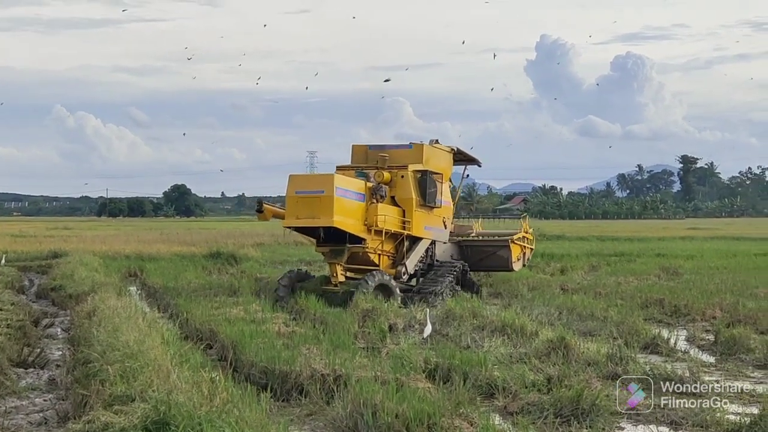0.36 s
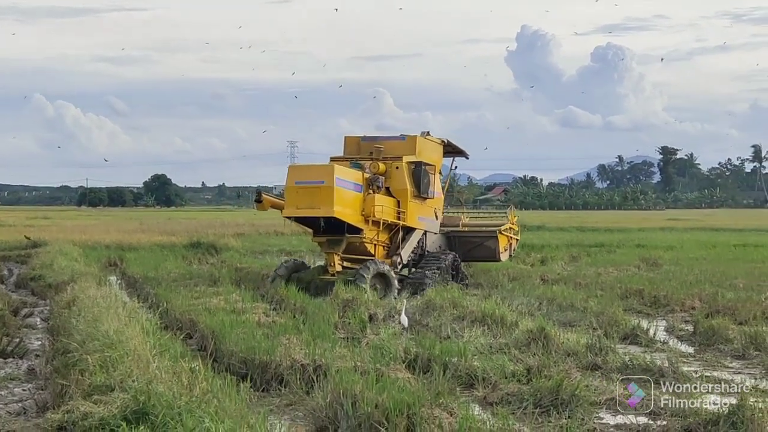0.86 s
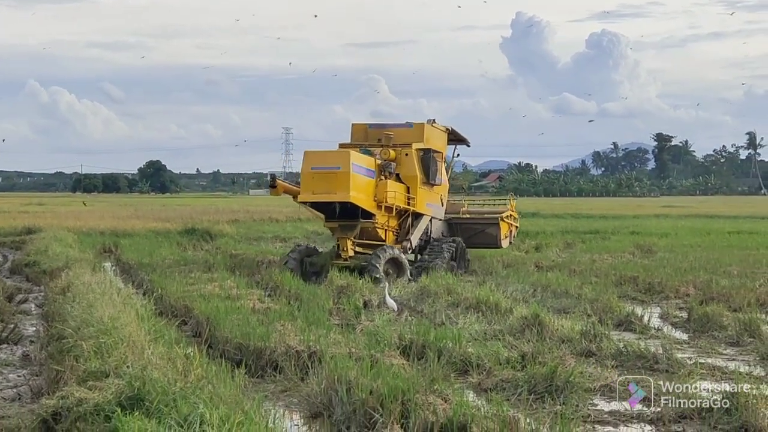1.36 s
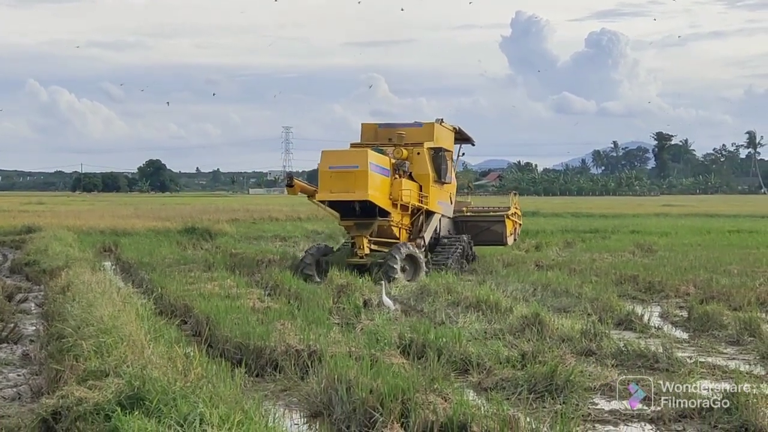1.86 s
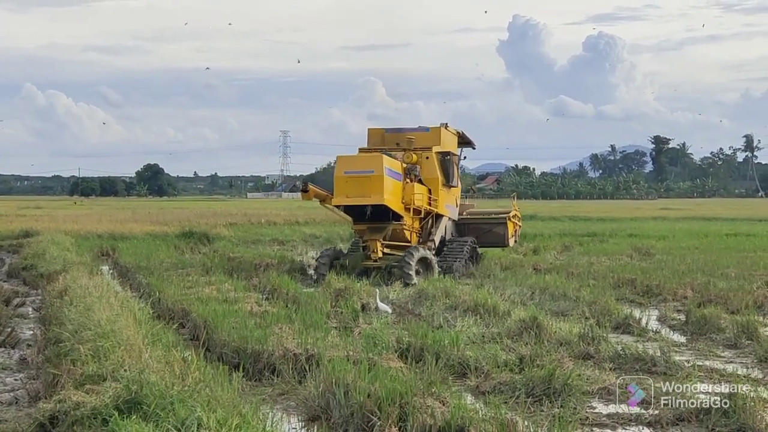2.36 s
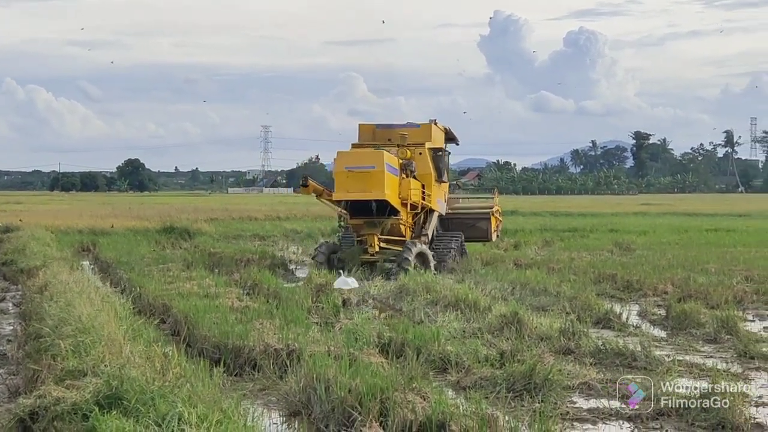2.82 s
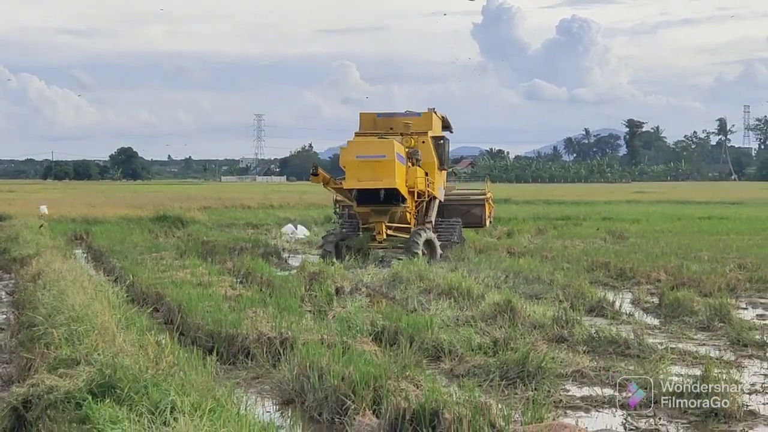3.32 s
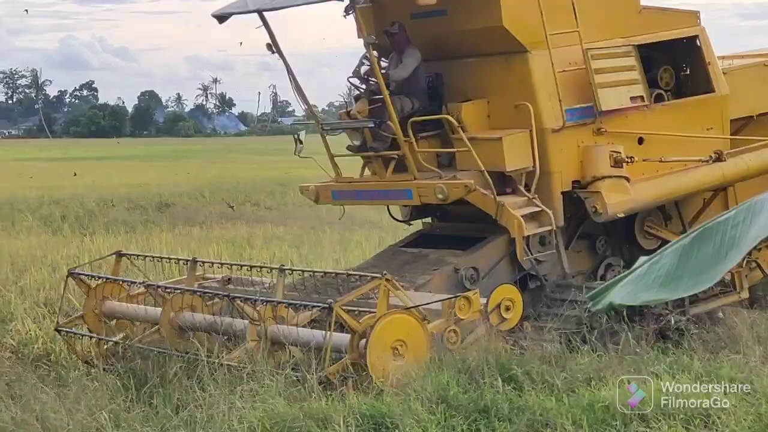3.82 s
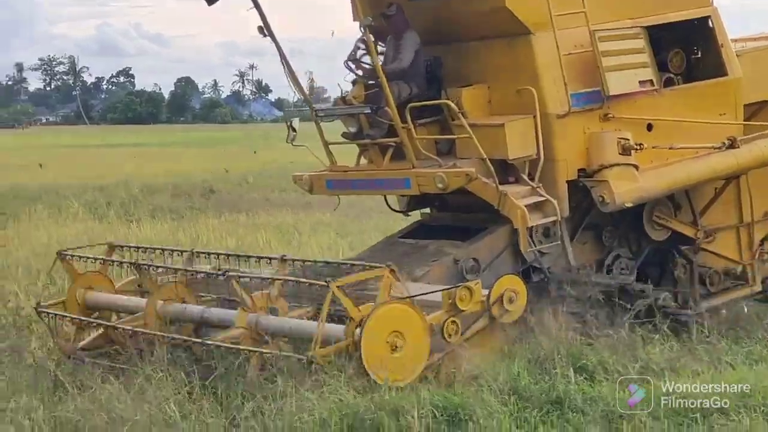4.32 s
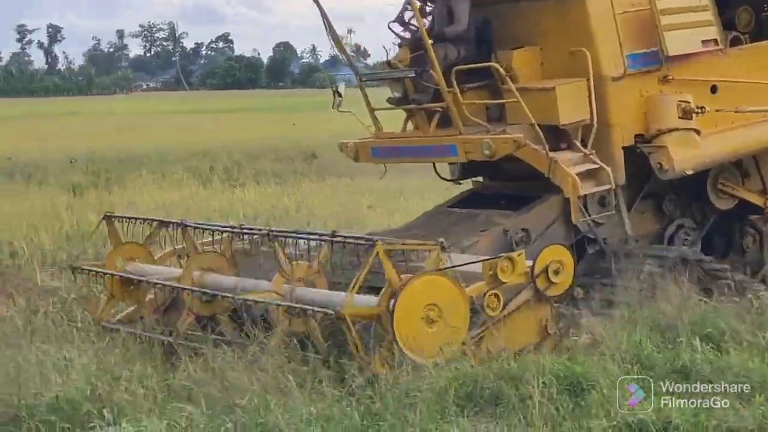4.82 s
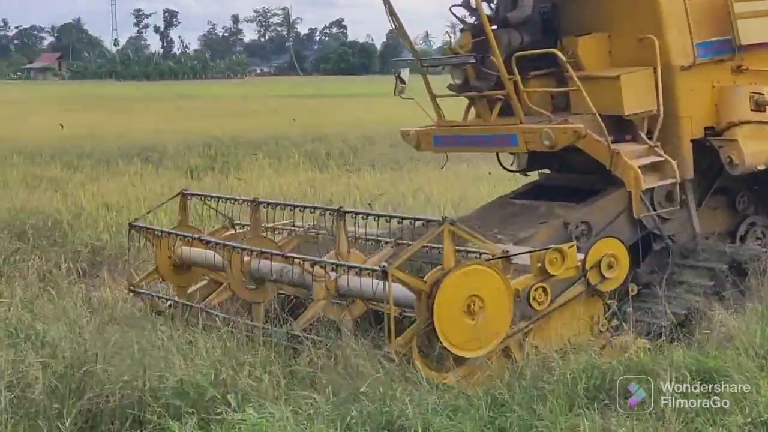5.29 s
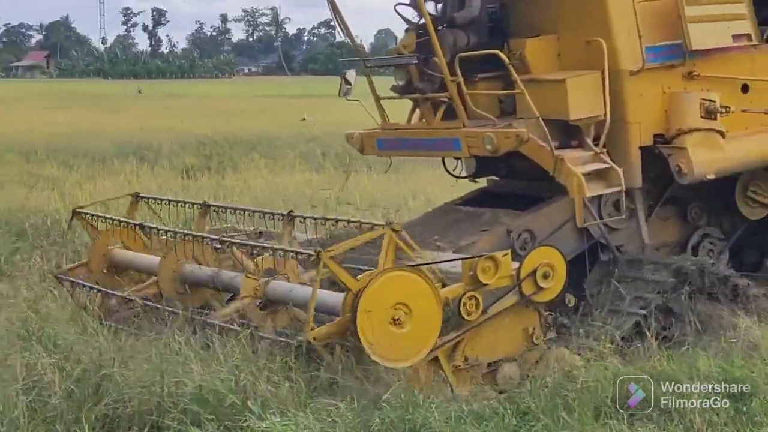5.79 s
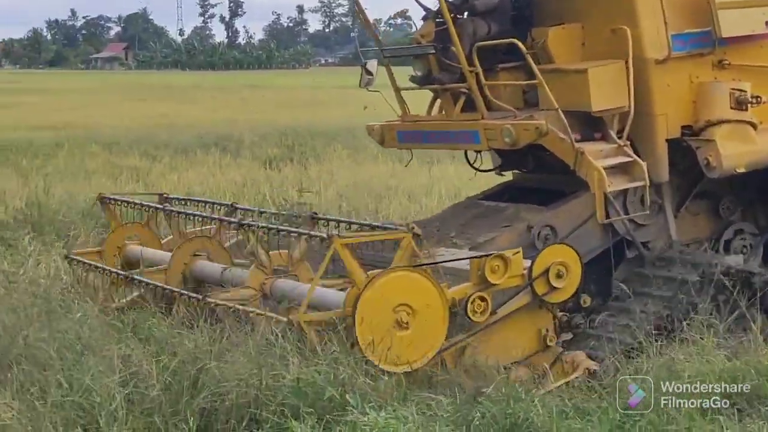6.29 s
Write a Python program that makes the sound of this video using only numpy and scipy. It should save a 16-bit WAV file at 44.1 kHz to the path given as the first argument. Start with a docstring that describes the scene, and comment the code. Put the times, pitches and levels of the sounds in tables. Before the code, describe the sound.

A phone outdoors hears a combine harvester driving away: a clean, humming exhaust tone around a low B, with dense low roar and soft clatter, some faint high chain tinkles early on. A brief digital repeat leads into a half-second total dropout. The machine then cuts back in at close range, slightly higher in pitch, with more belt hiss, reel clatter and crop rustle, running steadily until the cut-off.

```python
"""A steady diesel drone with clean exhaust tones stands over a roar of knock, fan and threshing noise.
A six-cylinder harvester works a wet field, heard by a phone: driving away, then, after silence, close by.
Tones follow the firing count; the roar is shaped noise, flickering by bands and echoed off the water surface.
Chains jingle faintly in the first shot, as bursts of resonant noise; short low booms swell in both.
At the cut the last 21 ms are heard twice, then half a second of silence leads to the near shot."""
import sys
import numpy as np
from scipy import signal
from scipy.fft import rfft, irfft
from scipy.io import wavfile
from scipy.ndimage import uniform_filter1d

SR = 44100
rng = np.random.default_rng(int(sys.argv[2]) if len(sys.argv) > 2 else 0)


def output_pcm(signal):
    """Save a mono or channel-first signal as 16-bit PCM at the path in sys.argv[1].

    Samples are clipped to [-1, 1] before scaling.
    """
    pcm = np.clip(np.atleast_2d(signal).T, -1, 1) * 32767
    wavfile.write(sys.argv[1], SR, np.round(pcm).astype(np.int16))


def volts_from_decibels(level):
    """Turn decibel levels (scalar or array-like) into linear amplitude factors."""
    exponent = np.asarray(level, float) / 20
    return 10 ** exponent


N = 282681
TIME = np.arange(N) / SR  # s
HZ = np.fft.rfftfreq(N, 1 / SR)

# Tables with one entry per shot hold the far shot first, then the near one.
# when each shot runs: [start t/s, end t/s]
SHOT_SPAN = [(0, 3.5), (4.06, 6.41)]
STUTTER_S, SILENCE_S, RETURN_S = 3.5033, 3.5246, 4.0592
# engine, per shot: [t/s, firing rate f/Hz, firing tone rms level/dB]
ENGINE = [
    [(0.0, 121.6, -14), (0.3, 121.2, -13), (1.0, 120.9, -14), (1.22, 120.9, -14.5), (1.7, 121.2, -11.5),
     (1.85, 121, -14.5), (2.3, 120.9, -11.5), (2.55, 120.7, -14), (3.15, 120, -12.5), (3.5, 120.7, -13.5)],
    [(4.06, 122.6, -21), (4.28, 122.9, -13), (4.65, 123.3, -15.5), (5.2, 123.1, -15), (5.6, 122.6, -11.5),
     (5.8, 122.7, -13.5), (6.0, 123.1, -12), (6.41, 123.6, -14.5)],
]
# strong overtones, per shot:
# [multiple of firing rate, start rms level/dB, end rms level/dB, phase waver/rad, level wander/dB]
FIRING_OVERTONES = [
    [(1.5, -20.5, -23.5, .12, .9), (2, -44.5, -32, .3, 2.5), (2.5, -32, -35, .4, 2.5),
     (3, -44, -42.5, .4, 2.5)],
    [(1.5, -26, -27.5, 0.17, 2.5), (2, -24.5, -24, .12, .8), (2.5, -32.5, -32, 0.33, 1.5),
     (3, -37, -37, 0.34, 2)],
]
# weak tones of uneven cylinders, per shot: [multiple of engine cycle rate, level against firing tone/dB]
CYCLE_TONES = [
    [(4, -35.5), (5, -30), (7, -22), (8, -33), (10, -18), (11, -23), (13, -35), (14, -31.5), (16, -28.5),
     (36, -28.5), (39, -29.5), (44, -34), (47, -38), (48, -38), (60, -36.5), (72, -39.5), (81, -32.5)],
    [(4, -38), (5, -26), (7, -37), (8, -24), (10, -21), (11, -18.5), (13, -41), (14, -28), (16, -25.5),
     (54, -32), (63, -35.5), (87, -36.5)],
]
# colour of the noise within its layers, per shot: [f/Hz, relative level per Hz/dB]
NOISE_COLOUR = [
    [(15, -75.5), (25, -49.5), (64, -28.5), (87, -20.5), (123, -13), (229, -12), (309, -3), (451, -33.5),
     (734, -34), (1100, -38.5), (1610, -39.5), (1890, -31.5), (2350, -33.5), (2610, -39), (16000, -63.5)],
    [(15, -65), (25, -54), (64, -23), (92, -22.5), (123, -10.5), (145, -10), (170, -15), (317, -11),
     (439, -24.5), (695, -19), (962, -28.5), (1480, -32), (5000, -41.5), (7710, -52), (16000, -48)],
]
# ringing panels and housings, per shot: [f/Hz, width f/Hz, lift level/dB]
PANELS = [
    [(740, 320, 3), (1630, 160, 4.5), (2696, 180, 9), (3367, 67, 8), (3900, 450, 3.5), (4600, 300, 1),
     (6550, 300, 4.5)],
    [(687, 34, 1.5), (1626, 200, 2.5), (2200, 780, 7.5), (2810, 310, 5), (6860, 900, 5.5), (7800, 630, 4)],
]
# how alike the two microphone ports hear the noise, per shot: [f/Hz, likeness 0-1]
PORT_LIKENESS = [
    [(60, .88), (130, .95), (290, .97), (640, .95), (1410, .82), (3100, .5), (6820, .3), (15000, .25)],
    [(60, .9), (130, .95), (290, .97), (640, .93), (1410, .7), (3100, .35), (6820, .05), (15000, .05)],
]
# how the sound leans to one side, per shot: [f/Hz, left minus right level/dB]
SIDE_LEAN = [
    [(60, -1.0), (110, -1.0), (200, 0.0), (380, 0.0), (700, 0.0), (1290, 3.5), (2380, 4.5), (4400, 1.0),
     (8120, 4.5), (15000, 4.0)],
    [(60, 0.0), (110, 0.0), (200, 0.0), (380, -0.5), (700, -0.5), (1290, 1.0), (2380, 2.0), (4400, 0.0),
     (8120, 6.5), (15000, 8.5)],
]
# place and microphone, one row per shot: [water echo t/ms, echo share, right port late t/ms, knock depth,
# flicker level/dB, loudest clink peak over the uncoloured noise rms level/dB]
PLACE = [(1.314, 0.39, 0.011, 0.21, 0.73, -2.5), (1.364, 0.12, 0.092, 0.07, 1.0, 0)]
# later echo of the treble, from higher on the machine, one row per shot: [from f/Hz, echo t/ms, share]
TREBLE_ECHO = [(3408, 1.53, 0.55), (3300, 1.5, 0.046)]
ECHO_TOP_HZ = 8000  # here the echo is down to 1/e of its share
# loudness of the noise about its mean, per shot: [t/s, level of all layers/dB, extra treble level/dB]
NOISE_SWELL = [
    [(0.0, 0, -2), (0.3, -0.5, -1.5), (0.62, 1, -1), (0.85, -1, 0.5), (1.25, 1.5, 3), (1.55, -0.1, 4.5),
     (1.9, 0.2, -1.5), (2.3, -0.7, 2), (2.6, 0.1, 3.5), (2.8, 0.1, -1), (3.5, -0.3, 3)],
    [(4.06, -1.5, 3), (4.15, 1, 0.5), (4.75, 0.46, -1.2), (5.08, 0.5, 1), (5.25, -0.5, -1.5),
     (5.4, 0.1, 0.5), (5.6, -1.5, 3.5), (5.88, -2.5, 0.1), (6.0, -0.1, 0.3), (6.41, -1, -0.8)],
]
# rows: low rumble, engine roar, threshing clatter, track rattle, belt and fan hiss, crop rustle; per shot:
# [start level/dB, end level/dB, share of treble swell, share of firing knock, engine cycle throb level/dB]
NOISE_LAYERS = [
    [(-21.5, -24, 0.042, 0.02, 0.65), (-29, -29.5, 0.046, .4, 0.75), (-38, -38, 0.27, .3, 0.3),
     (-47.5, -44.5, 1, 3.1, 0.14), (-55, -56, 0.92, 3, 0), (-56, -55.5, .6, 4, 0.7)],
    [(-21, -19.5, 0.052, 0.02, 0.1), (-24, -25, 0.05, 1.1, 0.35), (-34, -38, 0.1, 1.1, 0.3),
     (-44.5, -46.5, .1, 1.1, 0.65), (-48, -46, 1.1, 1.1, 0.4), (-43.5, -47, 0.32, 1.1, 0.4)],
]
# borders between those six layers: [f/Hz]
LAYER_EDGES = (450, 1800, 3200, 6000, 9000)
# loudest shakes of a loose chain, before panning: [t/s, shake level/dB]
CHAIN_SHAKES = [(0.0158, -35.5), (0.0603, -43), (0.1989, -46), (0.2361, -46), (0.2713, -42), (0.4264, -47),
                (0.4419, -45), (0.5861, -42), (0.6913, -46)]
# resonances of the chain: [f/Hz, width f/Hz, relative level/dB]
CHAIN_RINGS = [(10780, 260, 0), (10150, 260, -8), (9000, 500, -9)]
# fainter shakes: loudest level/dB, spread below it/dB, mean time after the start/s
FAINT_JINGLE_DB, FAINT_SPREAD_DB, FAINT_FADE_S = -44.5, 8, .4
# low body resonance swelling into booms: [middle t/s, half length t/s, f/Hz, rms level at the top/dB]
BODY_BOOMS = [(0.03, .04, 308, -21), (0.27, .16, 292, -21), (0.6, .09, 290, -24), (1.19, .06, 300, -21),
              (1.93, .05, 308, -22), (2.1, .07, 308, -22), (2.72, .04, 305, -26), (4.36, .06, 160, -22),
              (4.83, .06, 338, -23)]


def columns(table):
    """Columns of a time curve, read at every sample."""
    s, *values = np.transpose(table)
    return [np.interp(TIME, s, v) for v in values]


def over_hz(table, hz):
    """A spectrum table read on a log-frequency axis."""
    f, v = np.transpose(table)
    return np.interp(np.log(np.maximum(hz, 1)), np.log(f), v)


def unit(x):
    """Scale to rms 1."""
    return x / np.sqrt(np.mean(x ** 2))


def walk(rate):
    """Random levels held 1 / rate s and slewed twice; rms 1."""
    hold = int(SR / rate)
    steps = np.repeat(rng.standard_normal(N // hold + 1), hold)
    return unit(uniform_filter1d(uniform_filter1d(steps, hold), hold)[:N])


def exhaust(curve, overtones, cycle, span, crest_s):
    """Exhaust pulses give wavering tones locked to the firings; returns the tones and the firing count."""
    hz, firing_db = columns(curve)
    firings = np.cumsum(hz) / SR
    # crest_s falls just before a tall crest, where every second firing's crests meet
    at_crest = firings[int(crest_s * SR)]
    firings += 2 * np.ceil(at_crest / 2) - at_crest - .06
    out = volts_from_decibels(firing_db + .25 * walk(9)) * np.cos(2 * np.pi * firings + 0.043 * walk(24))
    for multiple, start_db, end_db, waver, wander_db in overtones:
        db = np.interp(TIME, span, (start_db, end_db)) + wander_db * walk(8)
        phase = 2 * np.pi * (round(2 * multiple) * firings / 2)
        out = out + volts_from_decibels(db) * np.cos(phase + waver * walk(24))
    for multiple, db in cycle:
        drift = rng.random() + .15 * walk(4)
        phase = 2 * np.pi * (int(multiple) * firings / 6 + drift)  # six firings make one engine cycle
        out = out + volts_from_decibels(firing_db + db + 1.01 * walk(6.2)) * np.sin(phase)
    return np.sqrt(2) * out, firings


def exhaust_at_ports(tones, late_ms, lean):
    """The right port hears the tones late; moving air sways them a little from side to side."""
    late = np.interp(TIME - late_ms / 1000, TIME, tones)
    lean_db = over_hz(lean, 120) + .45 * walk(5)
    return np.array([tones, late]) * volts_from_decibels(lean_db * np.array([[.5], [-.5]]))


def work(swell, layers, span):
    """Level of each noise layer in dB: a slow slope with distance and angle, plus the common swells."""
    all_db, treble_db = columns(swell)
    return [np.interp(TIME, span, (start_db, end_db)) + all_db + share * treble_db
            for start_db, end_db, share, *_ in layers]


def clinks(count, peak_db):
    """Loose links, teeth and bolts: decaying sines at any high pitch, at any moment."""
    out, t = np.zeros(N), np.arange(int(.05 * SR)) / SR
    for when, pitch, size in rng.random((count, 3)):
        hz, i = 3500 + 11500 * pitch, int(when * (N - len(t)))
        ring = np.sin(2 * np.pi * hz * t) * np.exp(-t / .006)
        out[i:i + len(t)] += volts_from_decibels(peak_db - 12 * size) * ring
    return out


def resonance(hz, width):
    """Bell-shaped response of one resonance, 1 at its centre and 1/2 at the edges of its width."""
    return 1 / (1 + ((HZ - hz) / (width / 2)) ** 2)


def port_noise(likeness, late_ms, clink_db):
    """Spectra of noise and clinks at two ports: partly alike by frequency, the right one late."""
    like = np.clip(over_hz(likeness, HZ), 0, 1)
    mid, side = rfft(rng.standard_normal((2, N)))
    mid = mid + rfft(clinks(count=900, peak_db=clink_db))
    pair = np.sqrt(1 + like) * mid + np.sqrt(1 - like) * side * [[1], [-1]]
    pair[1] *= np.exp(-2j * np.pi * HZ * late_ms / 1000)
    return pair


def water_echo(echo_ms, echo_share, high_echo):
    """Water adds one delayed copy; stubble and ripples scatter the treble, so the copy is dull."""
    from_hz, high_ms, high_share = high_echo
    high = HZ > from_hz
    delay_ms, share = np.where(high, high_ms, echo_ms), np.where(high, high_share, echo_share)
    mirror = share * np.exp(-(HZ / ECHO_TOP_HZ) ** 2)
    return 1 + mirror * np.exp(-2j * np.pi * HZ * delay_ms / 1000)


def machinery(levels_db, layers, high_echo, colour, body, likeness, lean, firings, place):
    """Half-octave noise bands flicker; firings push them by layer; panels ring and the water echoes."""
    echo_ms, echo_share, late_ms, knock, flicker_db, clink_db = place
    pair = port_noise(likeness, late_ms, clink_db)
    ring_db = sum(db * resonance(hz, width) for hz, width, db in body)
    colour_db = over_hz(colour, HZ) + ring_db + over_hz(lean, HZ) * [[.5], [-.5]]
    pair = pair * water_echo(echo_ms, echo_share, high_echo) * volts_from_decibels(colour_db)
    # every firing has its own strength and decays until the next
    strength = rng.standard_normal(int(firings[-1]) + 1)[firings.astype(int)]
    blow = volts_from_decibels(2.5 * strength) * np.exp(-(firings % 1) / .3)
    # uneven cylinders throb once and twice an engine cycle
    throb = np.cos(2 * np.pi * firings / 6) + np.cos(2 * np.pi * firings / 3)
    groups, shared = np.zeros((6, 2, N)), walk(5.96)
    rattle = walk(30)  # common shake, stronger in the higher layers
    octave = np.log2(np.maximum(HZ, 1))
    for centre in np.arange(4.5, 14.5, .5):
        window = np.cos(np.pi * np.clip(octave - centre, -.5, .5)) ** 2
        band = irfft(pair * window, N)
        group = np.searchsorted(LAYER_EDGES, 2 ** centre)
        *_, knock_share, throb_db = layers[group]
        band_db = flicker_db * (0.31 * shared + walk(12)) + 0.2 * group * rattle + throb_db * throb
        groups[group] += band * volts_from_decibels(band_db) * (1 + knock * knock_share * blow)
    # each layer is levelled by the rms of its two ports averaged
    return sum(volts_from_decibels(db) * g / np.sqrt(np.mean(g.mean(axis=0) ** 2)) for db, g in zip(levels_db, groups))


def faint_jingles(count):
    """Random (t/s, level/dB) shakes, thinning out from the start as the machine draws away."""
    when, size = rng.random((count, 2)).T
    return list(zip(-FAINT_FADE_S * np.log(1 - when), FAINT_JINGLE_DB - FAINT_SPREAD_DB * size))


def chain():
    """Each shake of the chain is a short decaying burst of noise in a few high resonances."""
    shake = np.zeros(N)
    for s, db in list(CHAIN_SHAKES) + faint_jingles(count=12):
        shake += volts_from_decibels(db) * np.exp(-np.maximum(TIME - s, 0) / 0.011) * (TIME >= s)
    response = sum(volts_from_decibels(db) * resonance(hz, width) for hz, width, db in CHAIN_RINGS)
    ringing = unit(irfft(rfft(rng.standard_normal(N)) * response, N))
    return shake * ringing * volts_from_decibels(np.array([[-2.5], [-7.]]))  # left, right dB


def booms():
    """A low body resonance booms: a rough tone that swells and fades smoothly."""
    waver, shake = .5 * walk(30), volts_from_decibels(1.5 * walk(25))
    out = np.zeros(N)
    for s, half, hz, db in BODY_BOOMS:
        swell = np.sqrt(2) * volts_from_decibels(db) * np.exp(-((TIME - s) / half) ** 2)
        out += swell * shake * np.sin(2 * np.pi * hz * TIME + waver)
    return out


def scene():
    """Two shots of the same machine, far and then near."""
    shots = []
    for k, crest_s in enumerate((STUTTER_S, RETURN_S)):
        span, layers, lean = SHOT_SPAN[k], NOISE_LAYERS[k], SIDE_LEAN[k]
        tones, firings = exhaust(ENGINE[k], FIRING_OVERTONES[k], CYCLE_TONES[k], span, crest_s)
        tones = exhaust_at_ports(tones, PLACE[k][2], lean)
        levels_db = work(NOISE_SWELL[k], layers, span)
        noise = machinery(levels_db, layers, TREBLE_ECHO[k], NOISE_COLOUR[k], PANELS[k],
                          PORT_LIKENESS[k], lean, firings, PLACE[k])
        shots.append(tones + noise)
    far, near = shots
    return np.where(TIME < RETURN_S, far + chain(), near) + booms()


def low_pass(x):
    """Removes everything above the highest recorded frequency."""
    return signal.sosfilt(signal.butter(12, 16520, fs=SR, output="sos"), x)


def record(dry):
    """The phone rounds the peaks and cuts the top; its last buffer plays twice, then silence to the next shot."""
    rounded = np.tanh(1.1 * dry) / 1.1
    top_cut = signal.ellip(10, .2, 60, 15650, fs=SR, output="sos")  # low-pass, edge in Hz
    mix = signal.sosfilt(top_cut, rounded)
    stutter, silence, back = (int(s * SR) for s in (STUTTER_S, SILENCE_S, RETURN_S))
    mix[:, stutter:silence] = mix[:, 2 * stutter - silence:stutter]
    mix[:, silence:back] = 0
    return low_pass(mix)


dry = scene()
out = record(dry)
output_pcm(out)
```